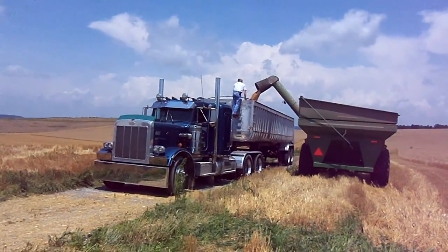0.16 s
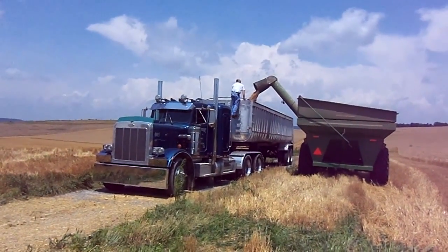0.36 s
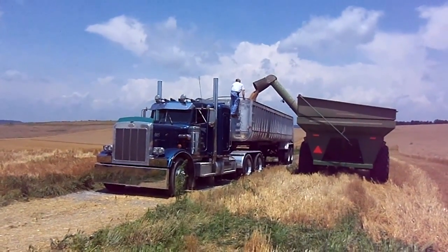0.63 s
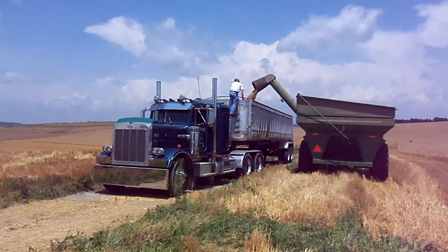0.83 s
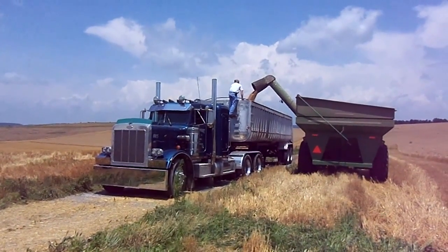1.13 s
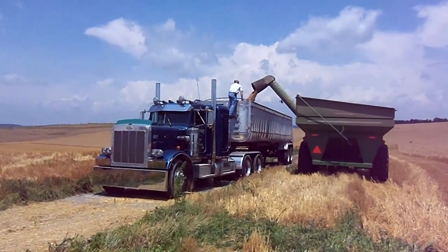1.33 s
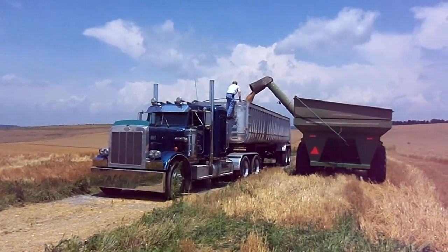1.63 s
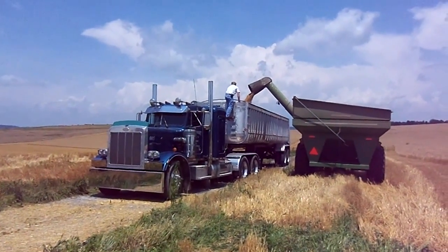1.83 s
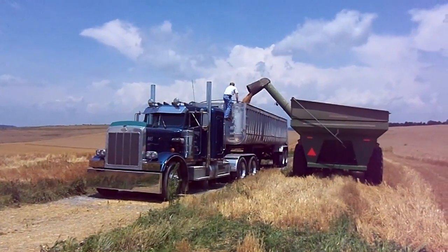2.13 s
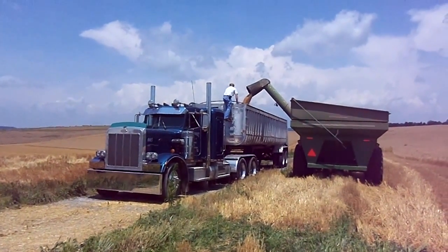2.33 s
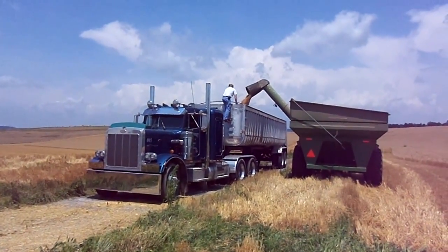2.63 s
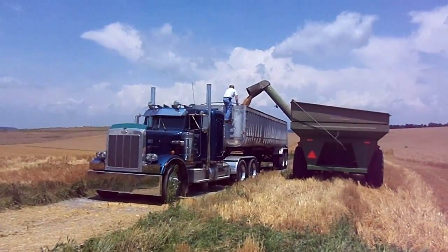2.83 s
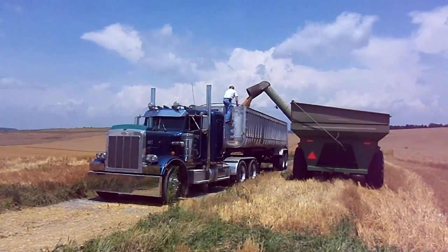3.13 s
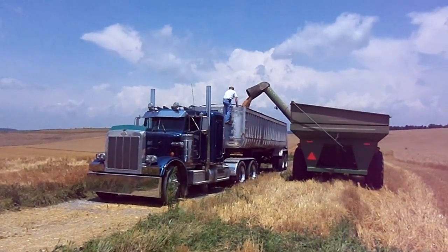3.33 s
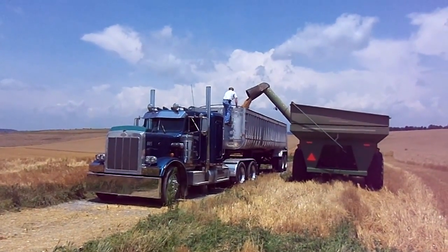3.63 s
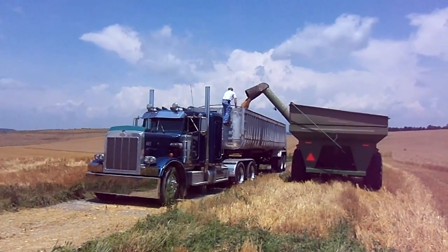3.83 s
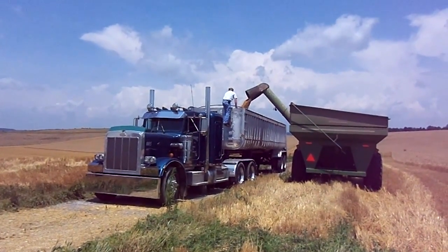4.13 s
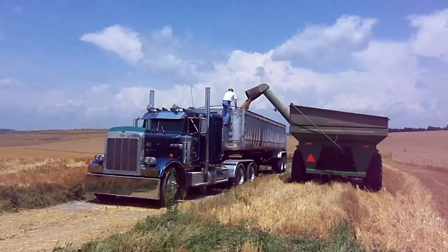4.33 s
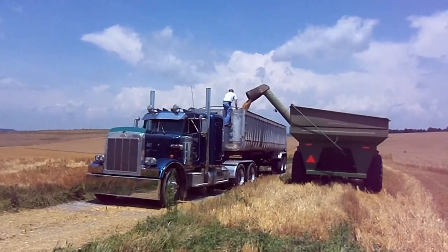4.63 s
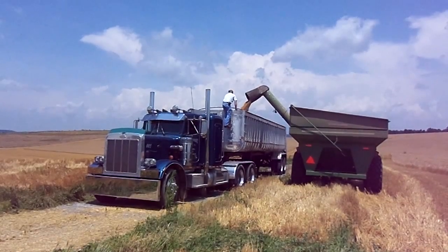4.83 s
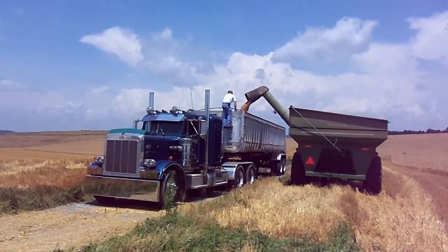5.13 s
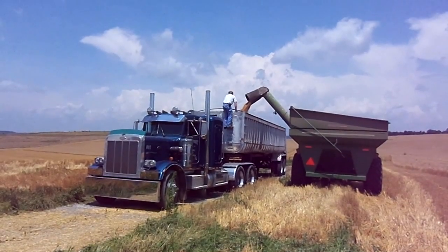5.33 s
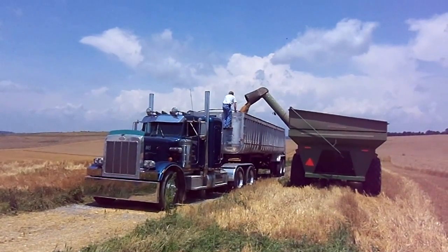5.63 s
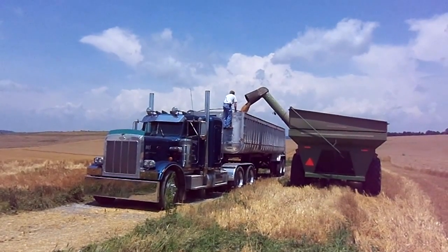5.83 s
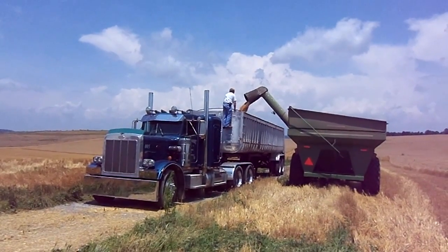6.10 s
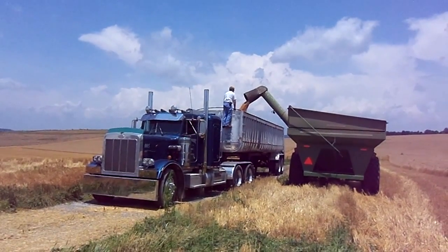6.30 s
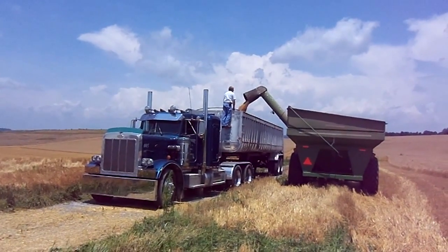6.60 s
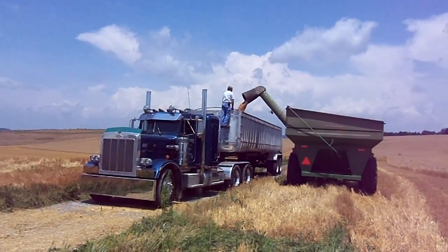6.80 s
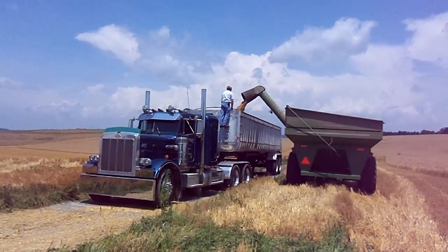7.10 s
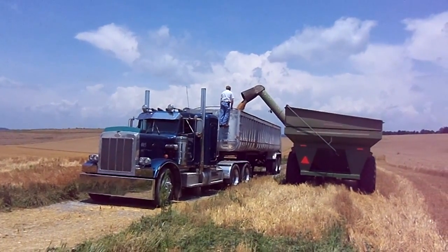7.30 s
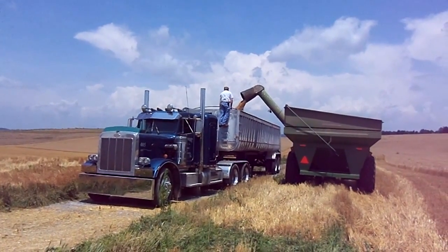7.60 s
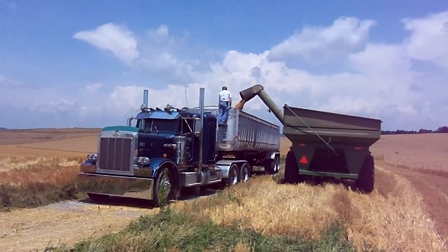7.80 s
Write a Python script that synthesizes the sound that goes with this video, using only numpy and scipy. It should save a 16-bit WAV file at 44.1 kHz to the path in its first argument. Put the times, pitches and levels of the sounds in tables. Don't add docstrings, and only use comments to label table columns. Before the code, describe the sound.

Outdoor grain unloading: constant kernel hiss, idling diesel clatter, tractor hum and tinny panel rattles, buffeted by heavy wind that ducks the machines.

```python
import sys
import numpy as np
from scipy import signal
from scipy.fft import rfft, irfft, next_fast_len
from scipy.io import wavfile
from scipy.ndimage import uniform_filter1d

SR = 44100
rng = np.random.default_rng(int(sys.argv[2]) if len(sys.argv) > 2 else 0)


def volts_from_decibels(level):
    exponent = np.asarray(level, float) / 20
    return 10 ** exponent


def master_out(mix):
    frames = np.transpose(np.atleast_2d(mix))
    ceiling = np.clip(frames, -1, 1)
    pcm = np.round(ceiling * 32767).astype(np.int16)
    wavfile.write(sys.argv[1], SR, pcm)


N = 350595
TRUCK_CYCLE_HZ = 5.413


def in_time(rows):
    s, *columns = np.transpose(rows)
    return [np.interp(np.arange(N) / SR, s, c) for c in columns]


def rms_one(x):
    return x / np.sqrt(np.mean(x ** 2) + 1e-20)


def drift(rate_hz):
    step = 40
    r = np.exp(-2 * step * np.pi * rate_hz / SR)
    settle = 2000
    white = rng.standard_normal(N // step + settle + 2)
    slow = signal.lfilter([1], [1, -2 * r, r * r], white)[settle:]
    return np.interp(np.arange(N) / step, np.arange(len(slow)), rms_one(slow - slow.mean()))


def band(x, low_hz, high_hz, order=2):
    return signal.sosfilt(signal.butter(order, [low_hz, high_hz], "band", fs=SR, output="sos"), x)


def resonance(x, hz, width_hz):
    r = np.exp(-np.pi * width_hz / SR)
    zeros = np.array([1, 0, -1]) * (1 - r * r) / 2
    poles = [1, -2 * r * np.cos(2 * np.pi * hz / SR), r * r]
    return signal.lfilter(zeros, poles, x)


def patchy(x, spectrum, shared_db, own_db):
    size, points = next_fast_len(N), np.array(spectrum)
    octave = np.log2(np.maximum(np.arange(size // 2 + 1) * SR / size, 1))
    known = np.log2(points[:, 0])
    coloured = rfft(x, size) * volts_from_decibels(np.interp(octave, known, points[:, 1], left=-99))
    out = 0
    for centre in np.arange(known[0], known[-1] + .5, .5):
        share = np.clip(1 - 2 * np.abs(octave - centre), 0, 1)
        out = out + irfft(coloured * share, size)[:N] * volts_from_decibels(shared_db + own_db * drift(9.8))
    return rms_one(out)


def tones(orders, levels_db, base_hz, wobble_s, waver_db, waver_rate_hz):
    in_step_s = .0015
    turns = base_hz * (np.arange(N) / SR - in_step_s + wobble_s * drift(0.662))
    out = 0
    for order, db in zip(orders, levels_db):
        level = np.sqrt(2) * volts_from_decibels(db + waver_db * drift(waver_rate_hz))
        out = out + level * np.cos(2 * np.pi * order * turns)
    return out


def grain():
    # (frequency [Hz], density [dB per Hz])
    grain_spectrum = [(1320, -25), (2250, -8.5), (2760, -3), (3020, -1), (3280, -2.5), (3540, -3),
                      (4680, 1.5), (6390, 1.5), (7770, -1), (8840, -5.5), (13700, -9.5)]
    kernels_per_s, auger_hz = 15000, 2.65
    landing = rng.random(N) < kernels_per_s / SR
    kernels = landing * volts_from_decibels(0.83 * rng.exponential(1, N)) * rng.choice([-1, 1], N)
    stream = rms_one(kernels) * 0.57 + rng.standard_normal(N)
    swell_db = 0.037 * np.sin(2 * np.pi * auger_hz * np.arange(N) / SR + 1.0) + .5 * drift(5.7)
    return patchy(stream, grain_spectrum, swell_db, own_db=0.79)


def exhausts():
    # multiples of its cycle rate, and levels [dB]
    truck_orders, truck_db = [6, 12, 24], [-12, -1.5, -14]
    # multiples of its firing rate, and levels [dB]
    tractor_orders, tractor_db = [1, 2, 5], [-1, -4.5, -29.5]
    tractor_firing_hz = 75.978
    truck = tones(truck_orders, truck_db, TRUCK_CYCLE_HZ, .0007, 1.5, 3)
    return truck + tones(tractor_orders, tractor_db, tractor_firing_hz, .0004, 1.0, 3)


def machine_roar():
    # (frequency [Hz], density [dB per Hz])
    roar_spectrum = [(120, -3), (200, 0), (361, -9.5), (631, 3), (782, -2.5), (1080, -0.5), (1290, -9),
                     (1470, -5.5), (1660, -9), (2600, -19.5), (3380, -45), (5720, -120)]
    return patchy(rng.standard_normal(N), roar_spectrum, .3 * drift(10), own_db=.5)


def gear_whine():
    # multiples of the cycle rate, and levels [dB]
    gear_orders, gear_db = [70, 76.2, 88, 111, 117, 133.8, 160, 175, 197.3, 250.1, 262.35, 1199.2], [-25.5, -24, -15, -23.5, -13.5, -18.5, -13.5, -18.5, -18,
                                                 -27, -18, -20]
    return tones(gear_orders, gear_db, TRUCK_CYCLE_HZ, .0005, 3.0, 14)


def truck_clatter():
    # (knock level [dB], valve rattle level [dB])
    cylinders = [
        (0, 0),
        (-5, 0),
        (-7, -9),
        (-1, 0),
        (-6, -7),
        (-4, -9),
    ]
    # (frequency [Hz], width [Hz], level [dB])
    block_modes = [(429, 19, -5.5), (452.4, 14.7, -3.5), (628, 74, -3.5), (718.3, 16.7, -3), (867, 105, -6),
                   (974, 19.3, -4.5), (1027, 21, -3.5), (1152, 110, -4.5), (1402, 660, -9.5),
                   (1612, 63, -8), (1825, 45, -20.5), (2025, 138, -4), (2063, 62, -3.5)]
    first_knock_s = .081
    cycle = (np.arange(N) / SR - first_knock_s) * TRUCK_CYCLE_HZ + 1 + 0.00098 * drift(1.32)
    firing = (cycle * 6).astype(int)
    since_s = (cycle * 6 - firing) / 6 / TRUCK_CYCLE_HZ
    chance_db = rng.normal(0, 1, (300, 2)) * [1.0, 2.5]
    knock_db, rattle_db = (np.array(cylinders)[firing % 6] + chance_db[firing]).T

    size = round(SR / TRUCK_CYCLE_HZ)
    repeated = np.interp(cycle % 1 * size, np.arange(size), rng.standard_normal(size))
    shake = 0.81 * repeated + 0.66 * rng.standard_normal(N)
    pulse = (1 - np.exp(-since_s / .002)) * np.exp(-since_s / .014)
    knock = shake * (volts_from_decibels(knock_db) * pulse + .16)
    block = 0
    for k, (hz, width_hz, db) in enumerate(block_modes):
        block = block + (-1) ** k * volts_from_decibels(db) * resonance(knock, hz, width_hz)

    rattle = rng.standard_normal(N) * volts_from_decibels(rattle_db) * np.exp(-since_s / 0.029)
    rattle = resonance(resonance(rattle, 3045, 200), 3045, 200)
    return rms_one(band(block, 333, 2770)) + volts_from_decibels(-16.5) * rms_one(rattle)


def turbulence(low_hz, high_hz, lumps_db, even_s):
    noise = band(rng.standard_normal(N), low_hz, high_hz)
    noise = noise / np.sqrt(uniform_filter1d(noise ** 2, round(even_s * SR)) + 1e-12)
    return rms_one(noise * volts_from_decibels(lumps_db))


def gustiness(order):
    # (time [s], level [dB])
    breeze = [(0.0, -35), (0.5, -26), (0.8, -28.5), (1.0, -32), (1.6, -29), (2.3, -26), (2.7, -25),
              (3.2, -32.5), (3.9, -32), (4.4, -29.5), (5.1, -29.5), (5.6, -31.5), (5.9, -35.5), (6.3, -37),
              (6.6, -28), (7.1, -34), (7.5, -32), (7.95, -32)]
    # (middle [s], half length [s], level [dB], gain per smaller eddy size [dB])
    gusts = [(0.057, 0.017, -24, -17), (0.363, 0.037, -22, -15), (0.82, 0.025, -32, -3),
             (1.203, 0.029, -22, -13), (1.815, 0.031, -17.5, -2), (2.162, 0.032, -16, -0.5),
             (2.21, 0.045, -25, -2), (2.297, 0.042, -23, -7), (2.377, 0.046, -17, -4.5),
             (2.432, 0.034, -15.5, 3.5), (2.492, .03, -18.5, 3.5), (2.553, 0.018, -22, 0.5),
             (2.886, 0.061, -14, -8.5), (3.11, .04, -34, -22), (3.436, 0.035, -24.5, -5),
             (3.57, 0.018, -27, -15), (3.698, 0.027, -21, -9), (3.79, 0.021, -24, -15),
             (3.97, 0.079, -24.5, -10), (4.177, 0.036, -11, -10.5), (4.434, 0.18, -23, -11),
             (4.927, 0.017, -20, -23), (5.176, 0.028, -15.5, -3), (5.334, 0.014, -15.5, -9),
             (5.457, 0.022, -19, -7), (6.58, 0.026, -26, -5.5), (6.826, 0.017, -25, -17),
             (6.966, .025, -22.5, 0), (7.05, 0.024, -22, -5), (7.599, 0.02, -12, -10)]
    breeze_tilt_db = -7
    lulls_db, lulls_per_s = 7.5, 8.5
    smaller_is_shorter = 0.99
    breeze_db, = in_time(breeze)
    lull = np.minimum(drift(lulls_per_s), .4)
    power = volts_from_decibels(breeze_db + order * breeze_tilt_db + lulls_db * lull) ** 2
    for s, half_s, db, tilt_db in gusts:
        x = (np.arange(N) / SR - s) / (half_s * smaller_is_shorter ** order)
        power += volts_from_decibels(db + order * tilt_db) ** 2 * np.exp(-2 * x * x)
    return np.sqrt(power)


def wind():
    # (time [s], peak [dB], push +1 or pull -1, width [ms])
    eddies = [(0.371, -8, 1, 2.6), (0.478, -14, 1, 3.4), (0.661, -14, 1, 2.1), (1.352, -19, -1, 3.8),
              (1.811, -9, -1, 2.8), (1.833, -16, 1, 2.8), (1.934, -15, -1, 2.8), (2.136, -4, -1, 1.9),
              (2.161, -2, 1, 3.2), (2.169, -5, -1, 4), (2.871, -2, -1, 4), (2.88, -2, 1, 5.5),
              (2.902, -3, -1, 2.2), (3.442, -13, -1, 2.3), (3.688, -15, 1, 3.4), (4.003, -14, 1, 3.3),
              (4.155, -12, -1, 8), (4.199, -10, -1, 3.6), (4.736, -14.5, -1, 4.4), (5.178, -6, -1, 5),
              (5.331, -8, -1, 3), (5.463, -14, 1, 4), (5.647, -18, 1, 4.0), (6.34, -19, -1, 4.5),
              (6.7, -13, 1, 4.3), (6.954, -10, 1, 3.8), (6.978, -13, 1, 6), (7.017, -12, 1, 4),
              (7.16, -17, 1, 7.7), (7.595, -17, 1, 8)]
    lumps = drift(26.0)
    out = gustiness(order=0) * turbulence(13.6, 54.4, 0.57 * lumps, 0.111)
    out += gustiness(order=1) * volts_from_decibels(1.0) * turbulence(68.0, 157, 1.5 * lumps, 0.041)
    out += gustiness(order=2) * volts_from_decibels(-1.5) * turbulence(137, 354, 2.6 * lumps, 0.03)
    half = 1500
    for s, db, push, width_ms in eddies:
        x = np.arange(-half, half) / SR / width_ms * 900
        at = round(s * SR) - half
        swing = (1 - 1.66 * x * x) * np.exp(-x * x)
        out[at:at + 2 * half] *= 1 - .85 * np.exp(-x * x / 12)
        out[at:at + 2 * half] += np.sign(push) * volts_from_decibels(db - 3.0) * swing
    return out


def panel_rattle():
    # (time [s], level over the grain hiss [dB])
    rattles = [(0.3112, 4), (0.3626, 8), (0.4494, 3), (0.4863, 8), (0.6699, -2), (1.0206, 8), (1.2057, 5),
               (1.4177, 0), (1.6477, 0), (1.8457, 1.1), (2.0263, -3), (2.1276, 9), (2.3446, 5), (2.5172, 6),
               (2.8858, 2.5), (3.6865, 7), (4.2378, 4), (4.5176, 10), (4.794, 7), (4.9561, 7), (6.4028, 6),
               (6.4482, 5), (6.777, 2), (6.9192, 11), (7.4639, 5), (7.6695, 4), (7.8421, 9)]
    faint_per_s, faint_db = 6.3, -5.5
    knocks = (rng.random(N) < faint_per_s / SR) * volts_from_decibels(faint_db + 3.5 * rng.standard_normal(N))
    for s, db in rattles:
        knocks[round(s * SR)] = volts_from_decibels(db)
    fade_s = np.arange(2600) / SR
    burst = (1 - np.exp(-fade_s / 0.0021)) * np.exp(-fade_s / 0.0082)
    chatter = signal.fftconvolve(knocks, burst)[:N] * rng.standard_normal(N)
    return resonance(resonance(chatter, 3010, 260), 3010, 260) * volts_from_decibels(15.5)


def spits():
    # (time [s], peak [dB])
    spit_events = [(0.366, -17.5), (0.807, -24), (1.189, -27), (1.824, -20), (2.134, -12), (2.38, -16),
                   (2.414, -15), (2.454, -13.5), (2.473, -24), (2.495, -11.5), (2.51, -11), (2.553, -25),
                   (2.892, -16), (3.438, -27), (4.172, -31), (4.523, -25), (5.174, -20.5), (5.327, -27),
                   (5.439, -39), (6.575, -29.5), (6.825, -29), (6.948, -25), (7.048, -27.5)]
    spit_ms, size = 7.3, 3000
    out = np.zeros(N)
    fade = np.arange(size) / SR * 1000 / spit_ms
    envelope = fade * np.exp(1 - fade - 0.34 * fade ** 2)
    for s, db in spit_events:
        top_hz = np.clip(600 * volts_from_decibels(0.42 * (db + 3)), 260, 900)
        burst = band(rng.standard_normal(size), 220, top_hz, order=1)
        burst = band(burst, 166, 3.8 * top_hz)
        at = round(s * SR) - 100
        out[at:at + size] += volts_from_decibels(db - 15.0) * rms_one(burst * envelope)
    return out


def scene():
    # (time [s], level [dB])
    gain_steps = [(0.0, -30.5), (0.4, -31), (1.6, -31.5), (2.05, -32), (2.39, -34), (2.45, -36.5),
                  (2.79, -37), (2.97, -40), (5.49, -40.5), (6.07, -41.5), (7.46, -41.5), (7.57, -40),
                  (7.95, -38.5)]
    gain_db, = in_time(gain_steps)
    treble = grain() + volts_from_decibels(-3.0) * truck_clatter() + volts_from_decibels(-1.5) * machine_roar() + gear_whine()
    bass_gain = volts_from_decibels(-32.5 + 0.4 * (gain_db + 33.5))
    mono = volts_from_decibels(gain_db + 1.25) * treble + bass_gain * exhausts()
    mono += wind() + volts_from_decibels(gain_db) * panel_rattle() + spits()
    return np.array([mono, mono])


def two_channels(mono):
    # (time [s], low edge [Hz], high edge [Hz])
    unlike_bands = [(.118, 5100, 6900), (.118, 9600, 12400), (.791, 4200, 5200), (1.952, 5700, 6900),
                    (1.952, 11700, 13100), (3.183, 8300, 9700), (4.483, 5700, 6900), (6.805, 4600, 5700),
                    (6.805, 7500, 9000), (6.805, 11700, 13100), (7.131, 6800, 8300), (7.131, 11000, 12400),
                    (7.455, 8900, 10400)]
    side, size = np.zeros(N), 2048
    for s, low_hz, high_hz in unlike_bands:
        at = round(s * SR) - size // 2
        level = np.std(band(mono[at:at + size], low_hz, high_hz, order=4))
        noise = rms_one(band(rng.standard_normal(size), low_hz, high_hz, order=4))
        side[at:at + size] += 0.64 * level * noise * np.hanning(size) ** .5
    return np.array([mono + side, mono - side])


def top_cut(x):
    return signal.sosfilt(signal.butter(12, 13950, fs=SR, output="sos"), x)


def record(dry):
    ceiling = .51
    limited = dry[0] / (1 + np.abs(dry[0] / ceiling) ** 6) ** (1 / 6)
    return top_cut(two_channels(limited))


dry = scene()
out = record(dry)
master_out(out)
```